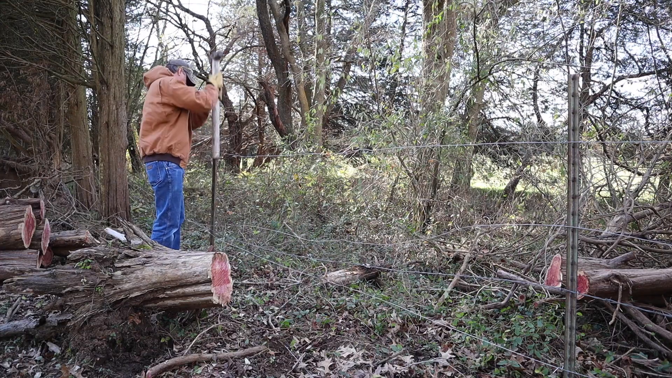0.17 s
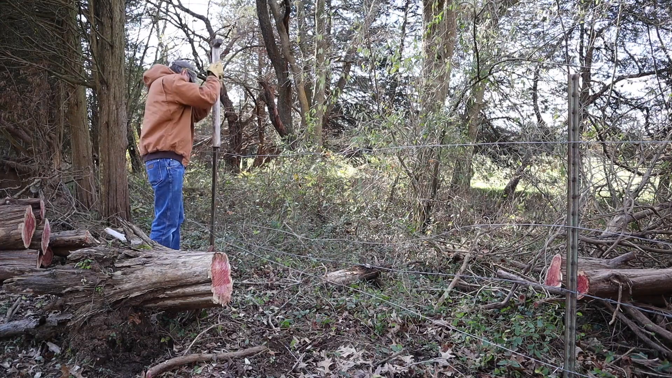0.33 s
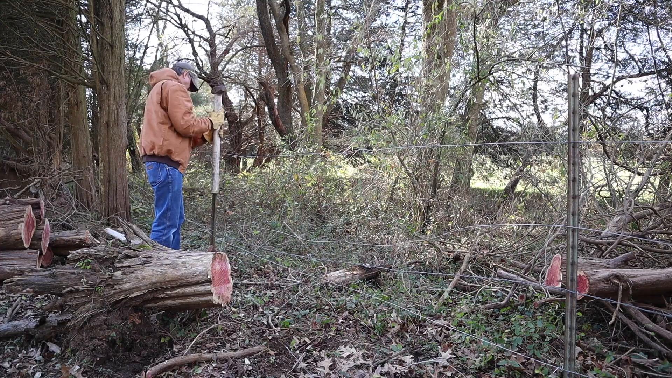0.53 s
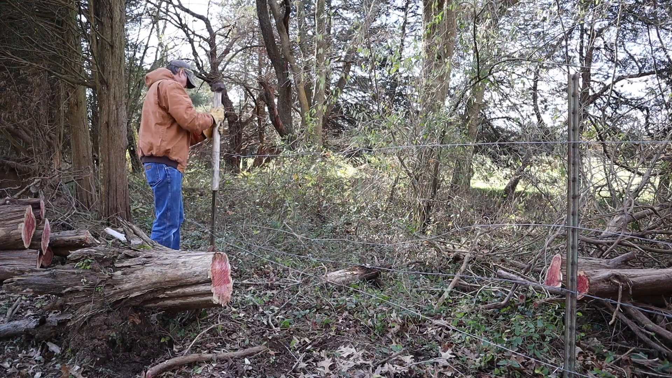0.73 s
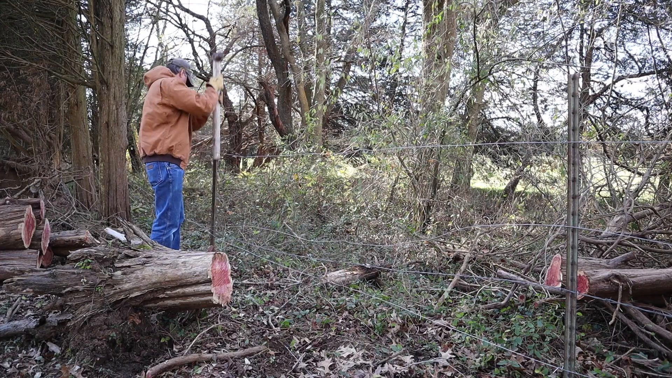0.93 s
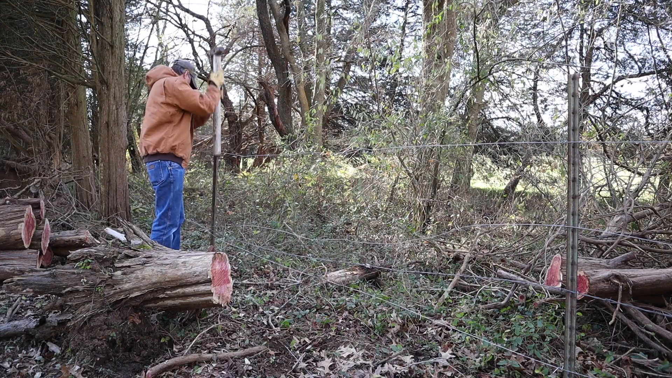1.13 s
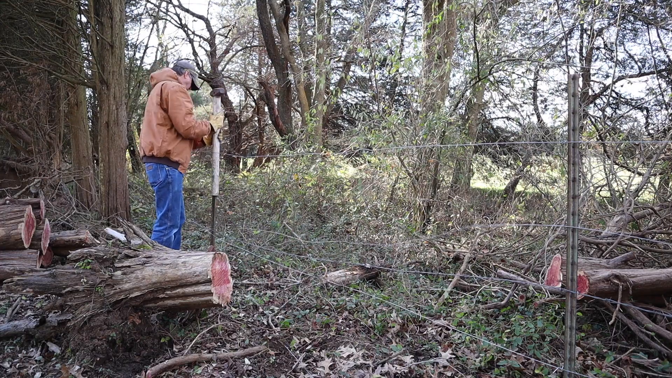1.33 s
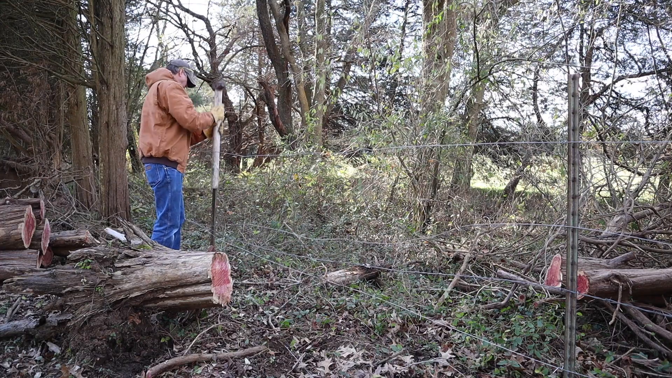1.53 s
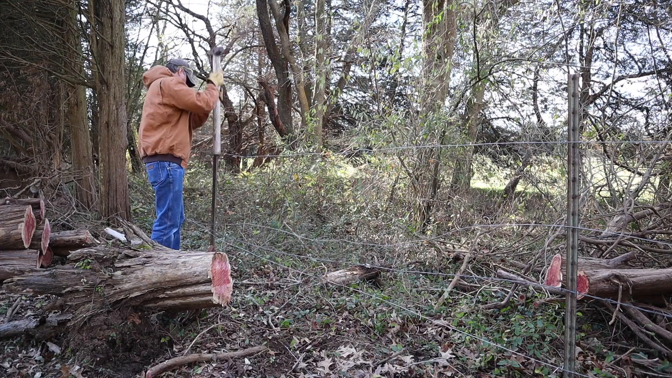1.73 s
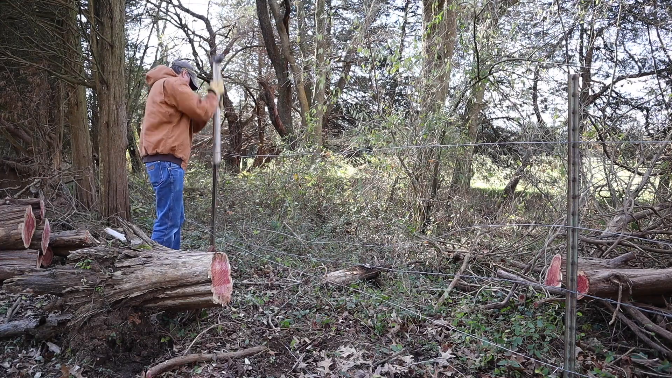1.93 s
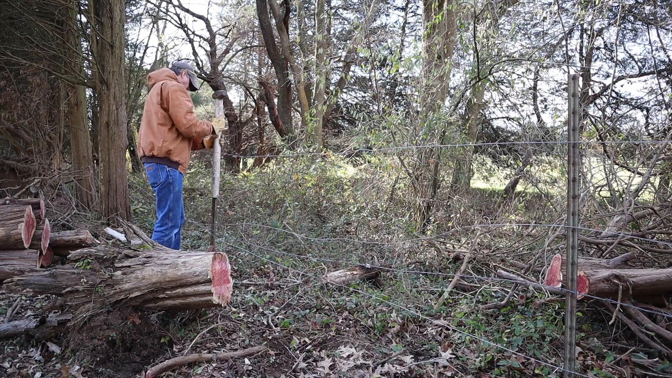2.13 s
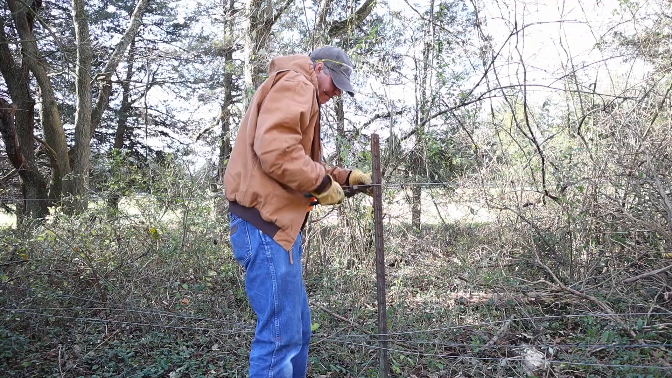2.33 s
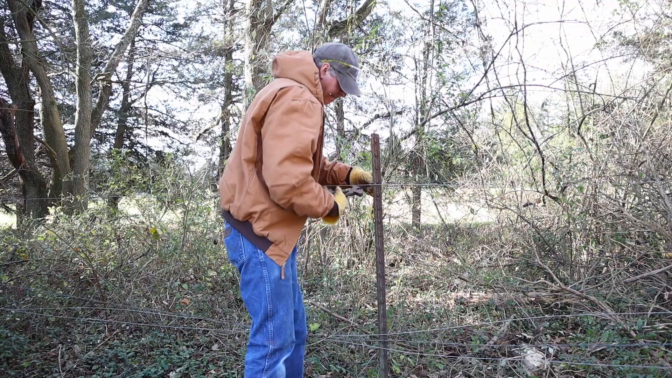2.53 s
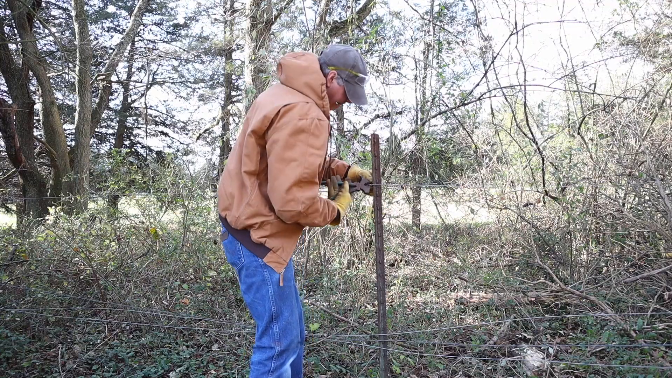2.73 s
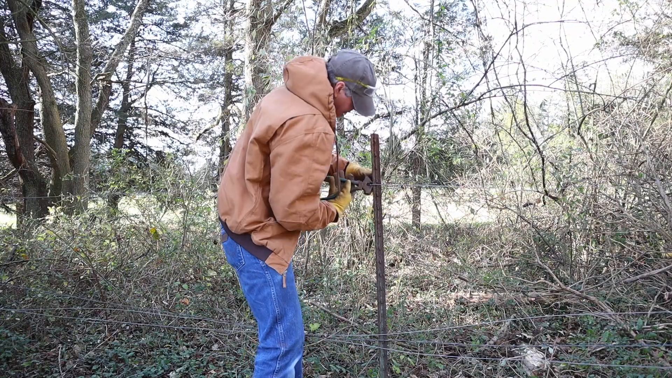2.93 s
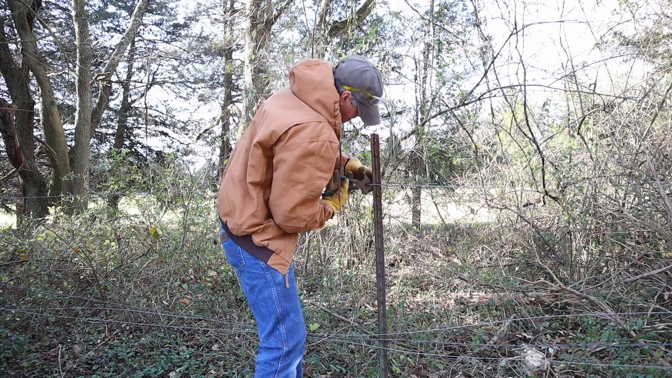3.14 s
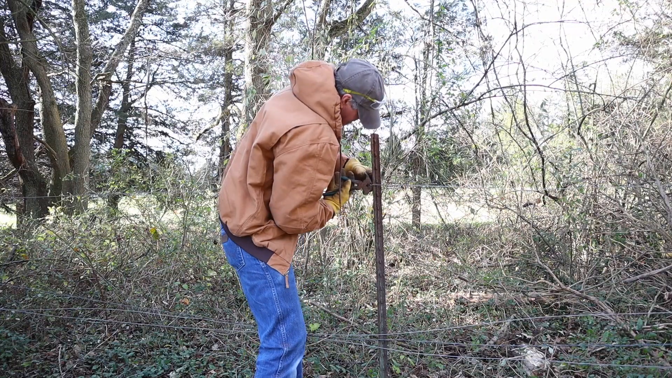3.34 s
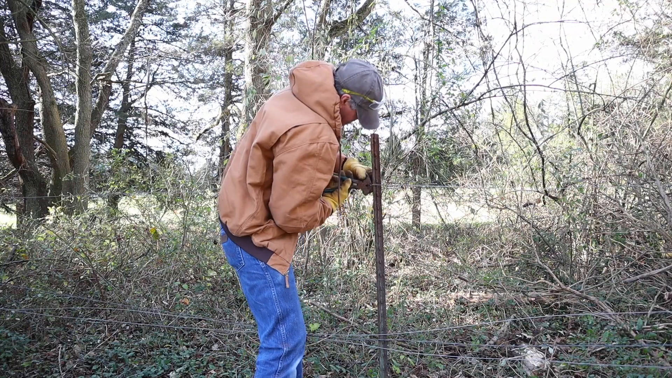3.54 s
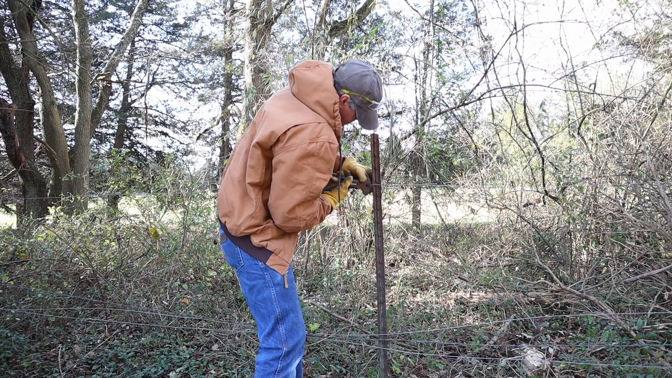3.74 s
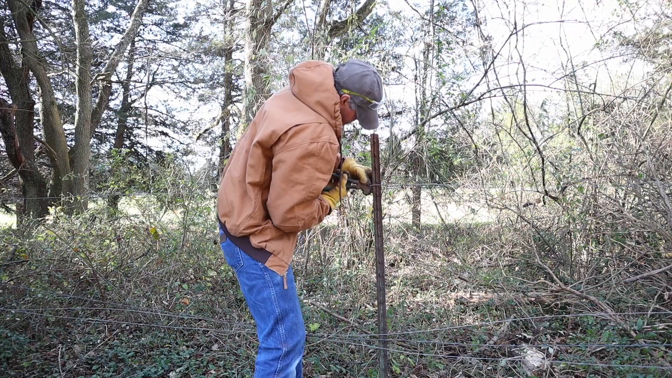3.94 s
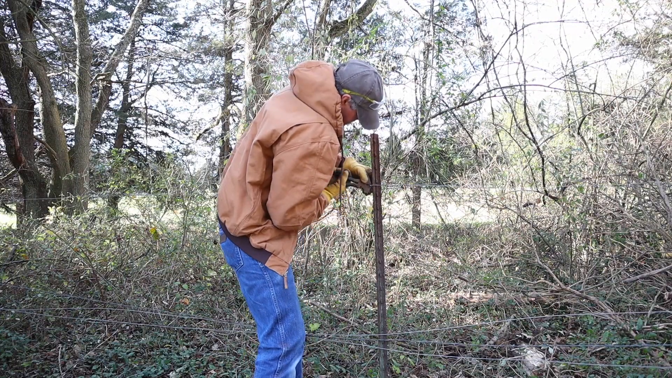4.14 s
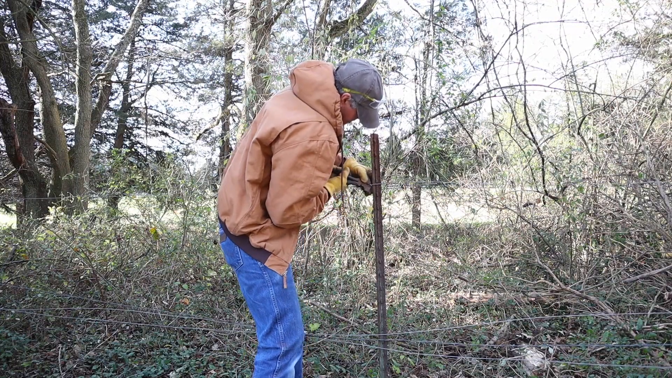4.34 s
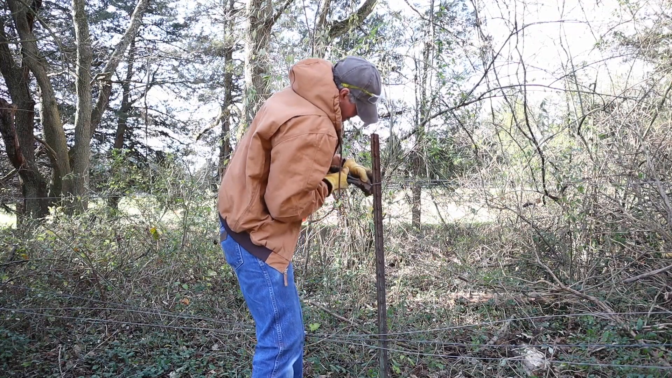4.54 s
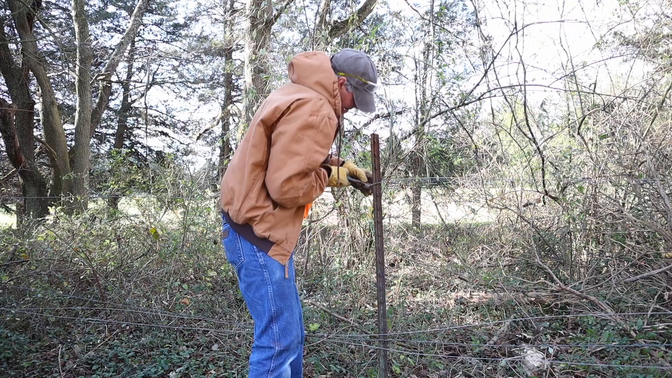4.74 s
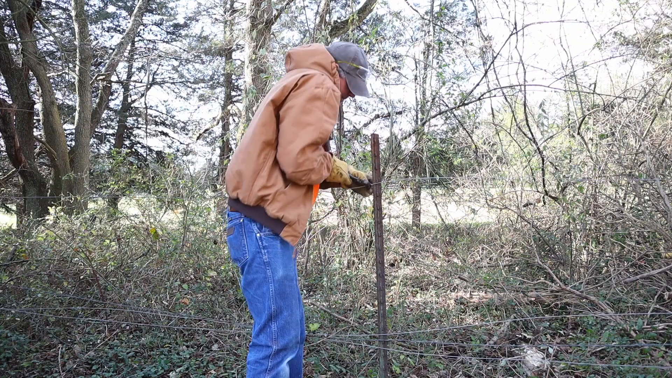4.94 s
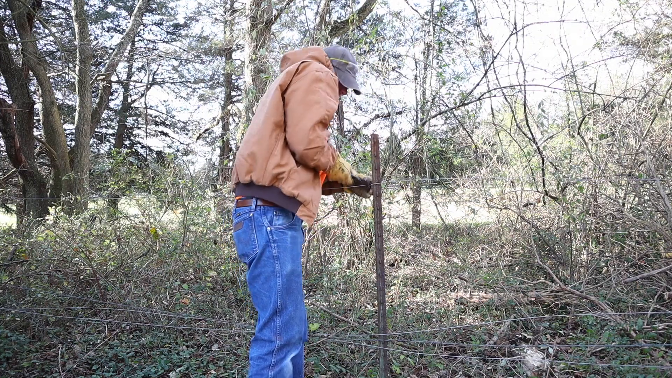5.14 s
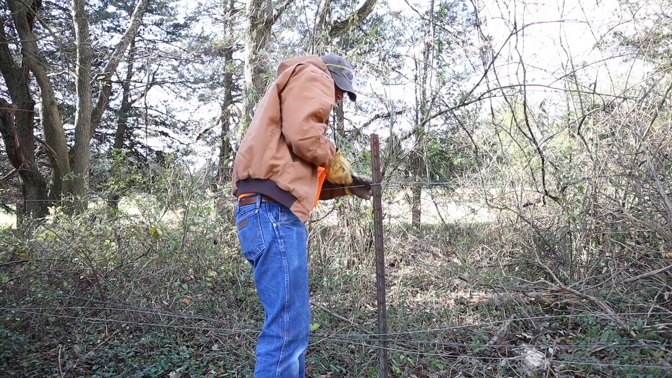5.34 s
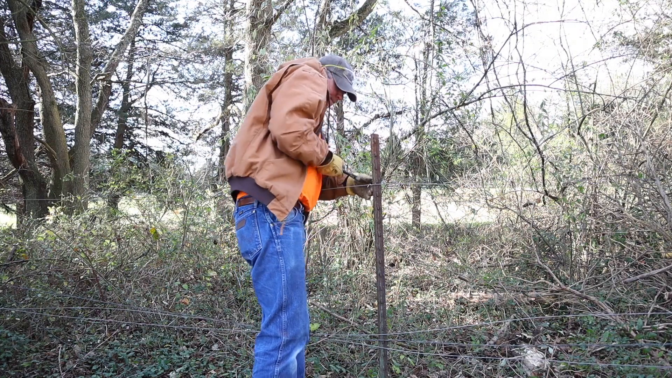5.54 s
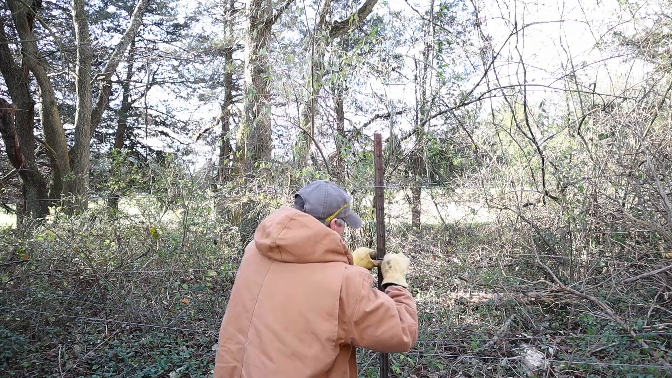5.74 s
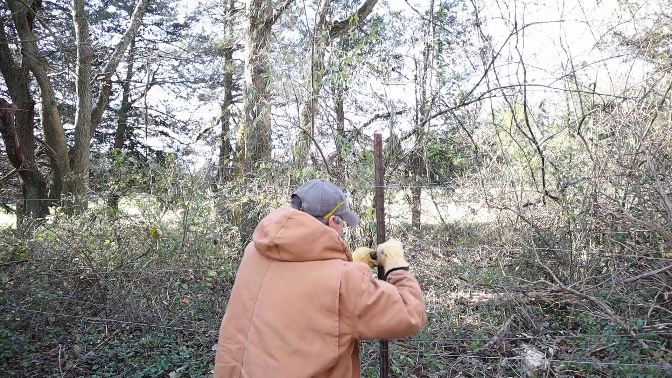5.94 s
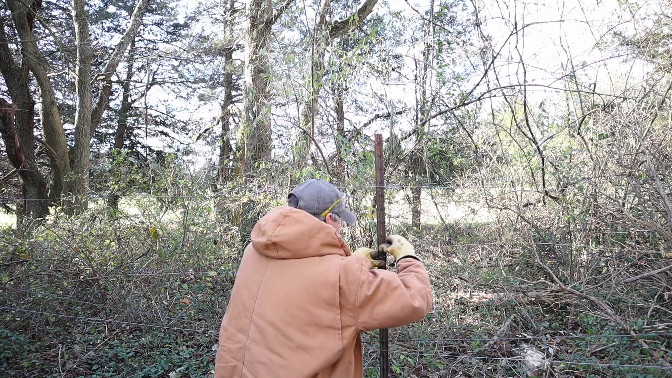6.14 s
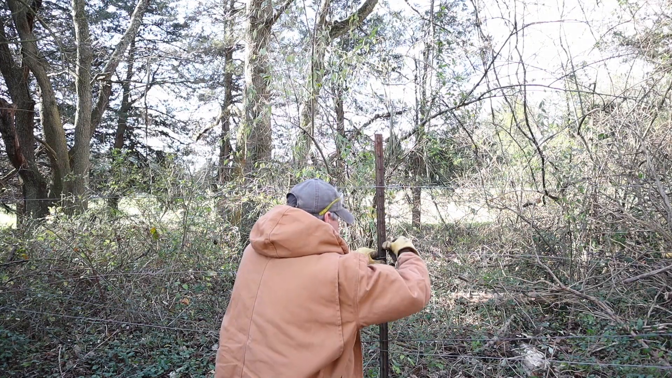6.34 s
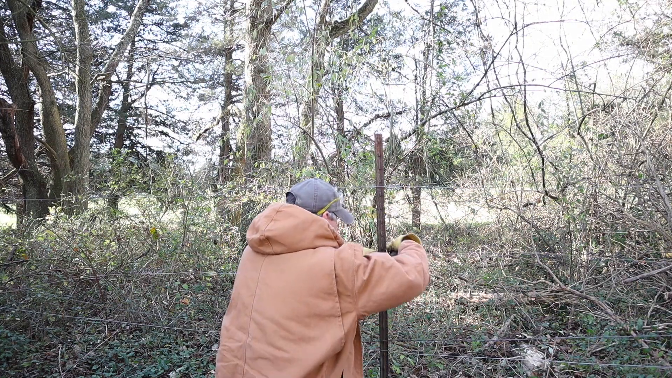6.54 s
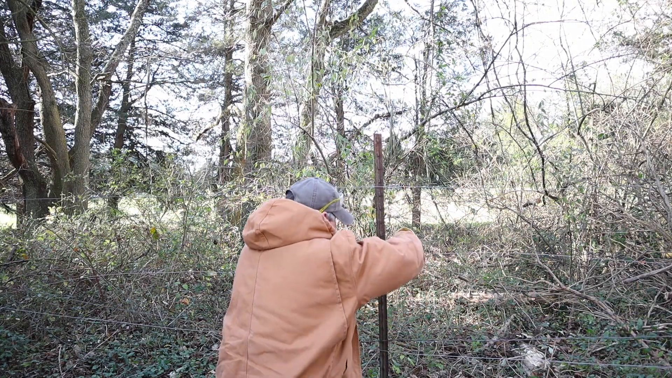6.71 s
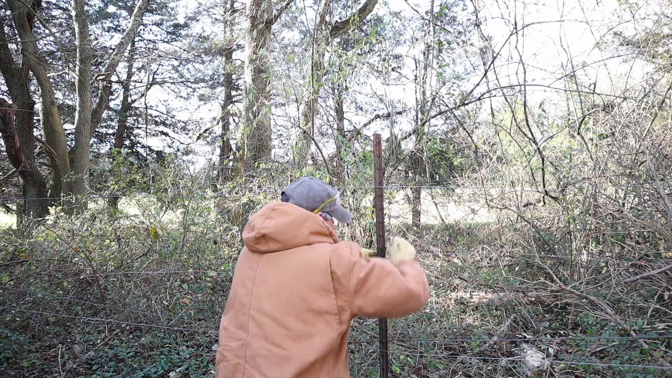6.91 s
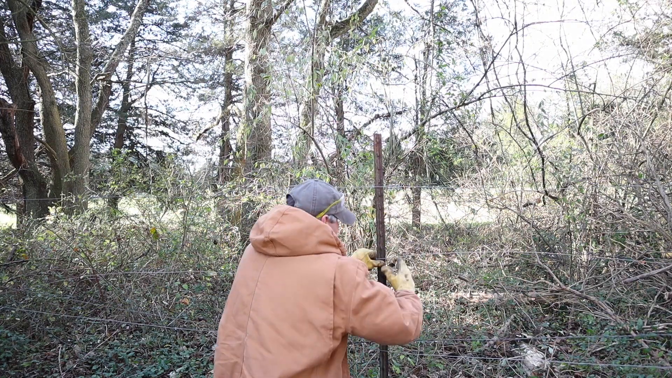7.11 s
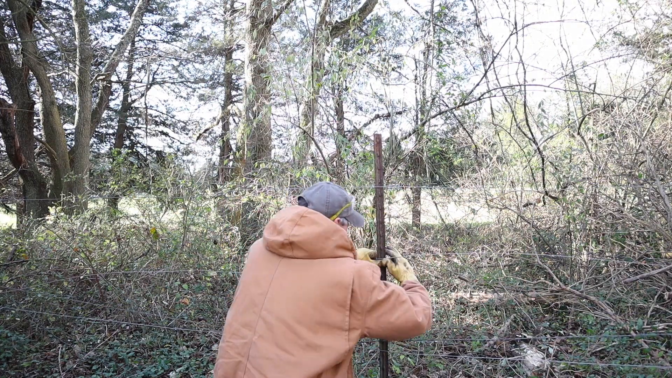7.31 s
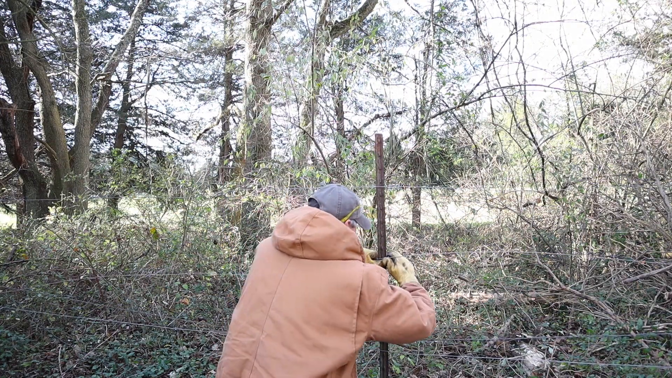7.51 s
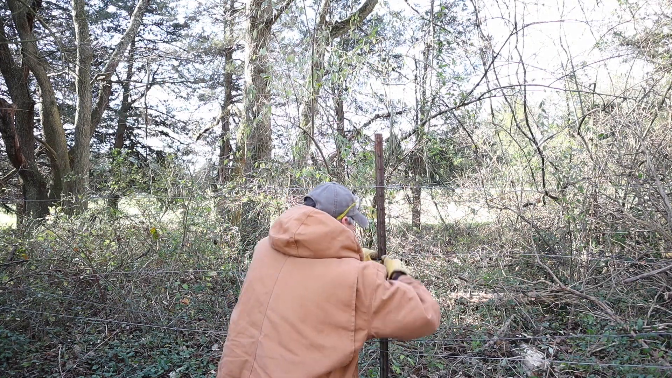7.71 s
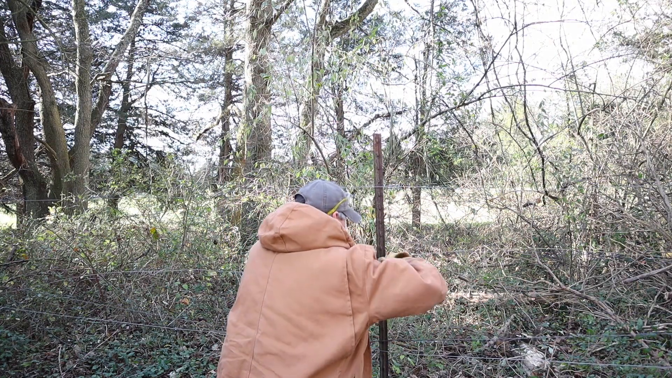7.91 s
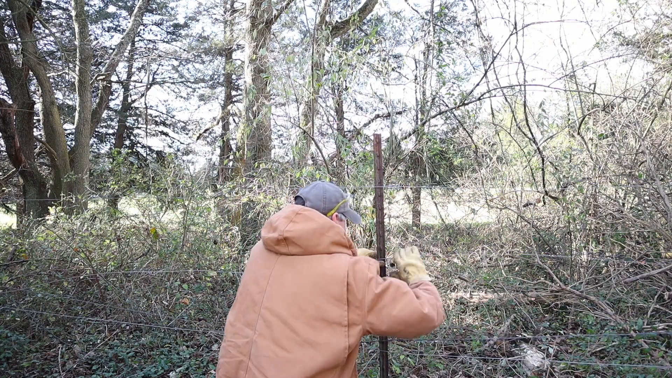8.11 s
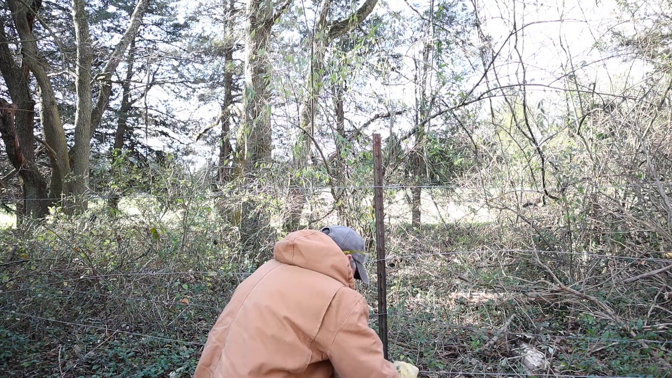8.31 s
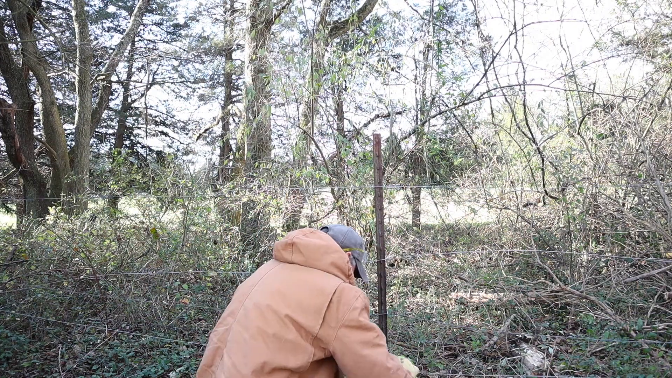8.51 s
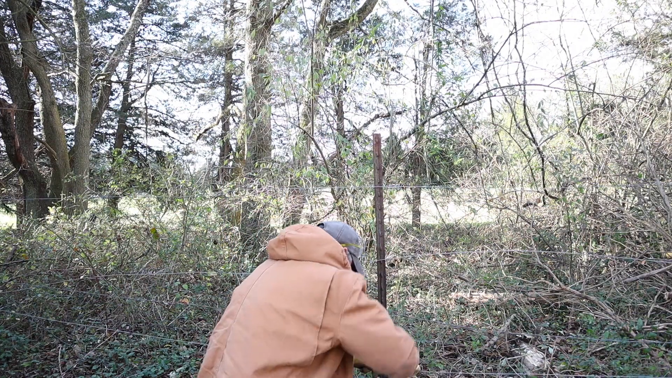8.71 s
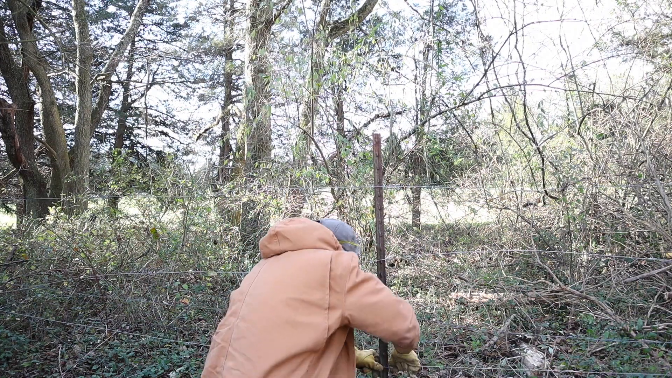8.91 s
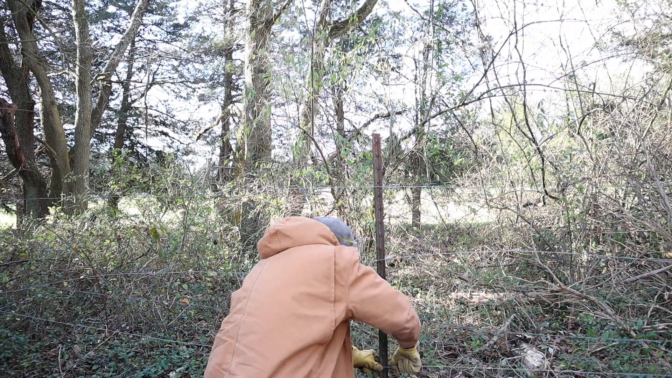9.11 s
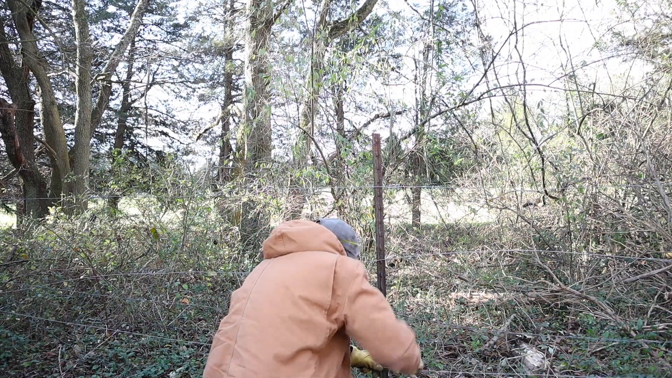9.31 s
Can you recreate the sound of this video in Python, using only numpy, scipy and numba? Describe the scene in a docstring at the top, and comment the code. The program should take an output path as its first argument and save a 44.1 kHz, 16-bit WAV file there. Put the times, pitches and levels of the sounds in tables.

```python
"""Rough steel scrapes upwards, knocks and slams: a man drives a fence post at the edge of a wood, in three strokes.
After an abrupt cut he clips wire to it while a distant vehicle passes; after another he works on in the quiet.
Struck steel is a sum of decaying modes plus noise bursts; sliding is a stream of random slips through resonators.
Wire, cloth and leaves are shaped noise, the vehicle is harmonics over coloured noise, and the wood is a scattered
tail. A fast limiter holds the clanks."""
import sys
import numpy as np
from scipy import signal
from scipy.fft import rfft, next_fast_len
from scipy.io import wavfile
from scipy.ndimage import uniform_filter1d, minimum_filter1d
from numba import njit

SR = 44100
rng = np.random.default_rng(int(sys.argv[2]) if len(sys.argv) > 2 else 0)


def log_audio(samples):
    """Write samples as a 16-bit WAV file to the path given in sys.argv[1]."""
    # one column per channel
    frames = np.atleast_2d(samples).T
    # limit to full scale, then quantise
    limited = np.clip(frames, -1, 1)
    pcm = np.round(limited * 32767).astype(np.int16)
    wavfile.write(sys.argv[1], SR, pcm)


N = 412776
T = np.arange(N) / SR
RING_T = T[:SR * 3 // 5]  # time axis of one ring or burst [s]
TOP_HZ = 16200  # upper limit of the sound

# the two cuts between the three sections: (time [s])
CUT_TIMES = (2.338, 5.775)

# strokes of the driver: (lift starts [s], tube tips over at the top [s], cap lands [s], scrape level [dB],
# blow level [dB], blow treble relative to body [dB], chatter length [s], low, middle, high favoured mode [Hz])
DRIVER_STROKES = [(0.107, 0.455, 0.5635, -44, -14.5, 0, 0.028, 1100, 2050, 4730),
                  (0.837, 1.215, 1.3224, -45.5, -16, 0, .021, 1050, 2560, 7130),
                  (1.609, 2.014, 2.0914, -45, -14, 1, .023, 2060, 3340, 3850)]
# modes of the post: (frequency [Hz], level [dB], t60 before favouring [s])
POST_MODES = [(102, -32, 1), (205, -24, .2), (307, -15, .37), (368, -8, .07), (511, -16.5, .23),
              (716, -26, .19), (942, -3.5, .115), (1045, -5, .05), (1110, -6, .055), (2035, -6, .055),
              (2072, -7, .125), (2628, -11, .075), (2988, -35, .65), (3144, -11, .08), (3190, -9, .075),
              (3440, -9, .07), (3812, -4, .06), (4177, -16, .1), (4796, -1.5, .075), (5028, -10, .06),
              (5190, -14, .09), (5372, -7, .085), (5722, -9, .06), (6210, -13, .08), (6500, -10, .065),
              (7205, -9, .06), (7412, -11, .065), (7640, -3.5, .068), (8192, -9, .065), (8344, -13, .07),
              (8988, -10, .095), (9685, -17, .065), (10968, -18, .07), (13008, -14, .115)]
# crowd of short-lived modes in a blow: (frequency [Hz], level [dB])
CLASH_SPECTRUM = [(50, -25), (110, -11.5), (220, 5.5), (300, 3.5), (410, 13.5), (600, 1.5), (800, 0),
                  (1080, 11), (1300, -2.5), (1650, -2.5), (2000, 7.5), (2350, 0), (3500, 5.5), (8000, 0.5),
                  (11000, -3.5), (16000, -13.5)]
# dense small modes of the post that outlast the crash: (frequency [Hz], level [dB])
SHIMMER_SPECTRUM = [(200, -20), (1500, -14), (3000, -1.5), (4500, 0), (6500, -3), (10000, -14),
                    (16000, -28)]
CLASH_T60_S, CHATTER_T60_S, CHATTER_DB = .075, .04, -3  # crash of a landing and of each rebound of the cap
SHIMMER_DB, SHIMMER_T60_S = -25, .27
CROWD_DB, CROWD_FULL_HZ = 6, 4000  # depth of the peaks in a clash, full above this frequency
# the spot that is struck favours some modes: louder, longer (as a fraction), over this range
FAVOUR_DB, FAVOUR_RING, FAVOUR_OCTAVES = 5.5, 0.08, 0.15

# the tube wobbles against the post, hardest as it tips over at the top:
# (time [s], body level before trim [dB], treble level before trim [dB], ring length [factor], favoured mode [Hz])
TUBE_KNOCKS = [(.261, -29.5, -43.5, 0.61, 1080), (.279, -35.5, -40, 1.15, 3850),
               (.327, -44.5, -47.5, 0.87, 3400), (0.351, -39, -48.5, 0.43, 1080),
               (0.414, -42.5, -54, .8, 1076), (0.4224, -35.5, -47.5, 1.3, 1074),
               (0.4512, -9, -18, 0.84, 1076), (.521, -46, -51, .7, 3840), (0.5361, -36.5, -30, 0.77, 4350),
               (0.7144, -36, -36, 1.07, 3850), (.775, -42.5, -65, 1.1, 1070), (.787, -44, -68, 1.1, 1070),
               (.846, -42.5, -48, 2.3, 945), (.899, -47, -52, 1, 3830), (.915, -45, -48, 1.1, 4320),
               (.929, -44, -45, 1.8, 4320), (1.0329, -34.5, -48, 0.63, 1076), (1.05, -36, -51, .8, 1076),
               (1.109, -48.5, -61, 1.1, 1076), (1.206, -11, -20.5, 0.7, 1100),
               (1.2678, -30.5, -36.5, 0.82, 360), (1.281, -40, -31.5, 0.67, 5400),
               (1.293, -42, -33, 1.2, 3440), (1.307, -33, -28.5, .87, 4350),
               (1.359, -34, -31.5, 0.74, 4350), (1.426, -33, -40.5, 0.57, 3370),
               (1.435, -35, -52, 0.79, 1070), (1.492, -45, -55, 1.1, 3830), (1.541, -48, -74, 1.1, 1070),
               (1.787, -39, -45.5, .9, 1070), (1.803, -34, -51, 0.78, 1052),
               (1.825, -35.5, -50.5, .57, 359.3), (1.842, -38, -54.5, 0.7, 1076),
               (1.873, -40.5, -58, 0.8, 1064), (1.919, -27.5, -46.5, 0.46, 1660),
               (1.936, -29.5, -42.5, 1.37, 1062), (1.993, -28.5, -38, 0.86, 4380),
               (2.0142, -13, -20, 0.79, 3770), (2.077, -41.5, -34.5, 1.5, 3860),
               (2.083, -30, -32, .97, 1066), (2.176, -39, -42.5, 1, 3800), (2.192, -37, -51, 0.76, 1050),
               (2.207, -41, -57, 1.1, 1076), (2.2522, -43.5, -38.5, 2.74, 3520)]
# modes of the driver's tube and the air in it: (frequency [Hz], level [dB], t60 before scaling [s])
TUBE_MODES = [(366, 2, .08), (402, -5, .045), (943, -15, .12), (1076, -1, .06), (1150, -9, .035),
              (1663, -9, .04), (1790, -11, .03), (2032, -7, .04), (2068, -19, .14), (2417, -19, .05),
              (2630, -19, .06), (3000, -28, .12), (3205, -14, .06), (3452, -15, .075), (3826, -10, .06),
              (4356, -13, .05), (5020, -19, .05), (5362, -15, .05), (5700, -17, .035), (6590, -18, .045),
              (7400, -21, .04), (8310, -24, .08), (9670, -25, .03)]
# crowd of short-lived modes in a knock: (frequency [Hz], level [dB])
THUD_SPECTRUM = [(50, -29), (110, -29), (220, -27), (420, 16), (750, 5), (1200, 9), (1800, -1.5),
                 (2400, -3.5), (3800, 1.5), (7000, -14.5), (11000, -16.5), (16000, -63.5)]
# crack of a knock: level at 0 dB of knock treble, dB gained per dB of that treble, decay
CRACK_DB, CRACK_GROWTH, CRACK_T60_S = 7.5, 1.68, 0.038
# light taps as the lift ends: spacing, body and treble before trim, spread
RATTLE_GAP_S, RATTLE_DB, RATTLE_TREBLE_DB, RATTLE_SCATTER_DB = 0.018, -47, -60.5, 2.5

# slowly dying modes of the raised driver and the post: (frequency [Hz], level [dB], t60 [s])
SINGING_MODES = [(2069, 0, .55), (2988, -9, .8)]
SING_LIFT_DB, SING_TIP_DB = -54.5, -43.5  # their level as the lift ends, and after the knock at the top

# wall resonances that sliding excites: (frequency [Hz], width [Hz], level [dB])
SCRAPE_MODES = [(370, 55, 6.5), (945, 24, 0), (1074, 41, 3), (1660, 22, -6), (2052, 20, 0.5),
                (2646, 22, -6.5), (3050, 100, -3.5), (3420, 20, -4.5), (3850, 25, -0.5), (4310, 14, -5),
                (5050, 50, -12.5), (5720, 40, -11), (6570, 56, -15), (7300, 60, -19), (8500, 170, -15)]
# slips that drive the air column: (frequency [Hz], level [dB])
COLUMN_SPECTRUM = [(100, -33.5), (250, -4.5), (450, 6), (750, 10), (1200, 4.5), (2400, -3), (3600, 1.5),
                   (6000, -25), (9000, -53.5), (16000, -79)]
# broad hiss of the rust itself: (frequency [Hz], level [dB])
RASP_SPECTRUM = [(200, -25), (500, -2), (1500, 0), (2400, -5), (3400, 1), (4500, -6), (7000, -16),
                 (16000, -40)]
LIFT_S = .23  # time to raise the driver
COLUMN_M, TRAVEL_M = .078, 0.18  # air column in the tube at rest, and what the lift adds
LIFT_ATTACK_DB_PER_S, LIFT_RELEASE_DB_PER_S = 161, 265  # the scrape on the way up sets in and dies
LOW_LIFT_DB = -7  # the scrape is this much softer while the tube still sits low
TIP_DB, TIP_S, TIP_DB_PER_S = -38.5, .024, 650.5  # scrape just before the top knock: level, length, edge slope
REST_DB = -61  # faint rubbing while the driver sits low on the post
WANDER_DB, WANDER_PER_S = 3, 30  # scale and rate of the swelling of each wall mode as the contact slides

# wire clip and pliers snap against the post:
# (time [s], treble level before trim [dB], body level before trim [dB], main resonance [Hz])
WIRE_CLICKS = [(2.834, -44, -45.5, 1080), (2.852, -38, -44.5, 1050), (3.8538, -47, -68, 1530),
               (4.2027, -41.5, -53, 1650), (4.217, -58, -47, 921), (4.2705, -69, -48.5, 1210),
               (4.498, -45, -64, 4200), (4.5323, -25, -43.5, 3500), (4.5454, -22.5, -44, 5370),
               (5.5317, -35, -39, 820), (5.571, -50, -46.5, 900), (5.9394, -31, -49.5, 4400),
               (5.956, -46, -56, 4500), (5.968, -28.5, -44.5, 3400), (5.9805, -31, -53, 4100),
               (5.998, -41, -55, 1500), (6.007, -40, -52, 1100), (6.019, -33.5, -45, 1600),
               (6.036, -33, -43, 1090), (6.043, -40, -50, 1000), (6.049, -38, -46, 1000),
               (6.054, -44, -48, 1050), (6.106, -42, -49, 1300), (6.1135, -44, -52, 1400),
               (6.1217, -36, -47.5, 1050), (6.207, -50, -56, 1500), (6.218, -27, -44.5, 3650),
               (6.233, -45, -52, 1200), (6.6751, -43.5, -53, 3840), (6.9188, -40, -49, 3700),
               (7.016, -50, -59, 5030), (7.5865, -40.5, -55, 3730), (8.0115, -48, -58, 960),
               (8.1, -70, -59, 1400), (8.132, -68, -60, 1400), (8.327, -53, -61, 2200),
               (9.007, -60, -55, 1450), (9.157, -55, -70, 1300)]
# noise burst of one snap: (frequency [Hz], level [dB])
SNAP_SPECTRUM = [(100, -40), (350, 4.5), (650, 8.5), (1100, 3.5), (1600, 2.5), (2700, -11.5), (3500, 2),
                 (4800, -0.5), (6500, -1.5), (10000, -5), (13000, -16), (16000, -20)]
# stray ticks of loose wire: rate, treble and body before trim, middle pitch, greatest scatter of level
TICKS_PER_S, TICK_TREBLE_DB, TICK_BODY_DB, TICK_HZ, TICK_SCATTER_DB = 1.6, -53, -66, 1270, 1
# dull knocks of hands and tools: (time [s], peak level [dB])
HAND_THUMPS = [(5.2731, -24), (5.419, -40), (5.5347, -32), (5.546, -38), (5.576, -39), (8.329, -47)]
# the wire grates as it is bent round the post: (time [s], half-length [s], level [dB])
WIRE_TWISTS = [(5.56, 0.025, -53.5), (6.02, 0.051, -58), (6.1, 0.02, -54.5), (6.232, 0.02, -57.5)]
# grating wire: (frequency [Hz], level [dB])
GRATE_SPECTRUM = [(100, -30), (450, 0), (1000, 7), (1600, 0), (2600, -18), (4200, -5), (10000, -14),
                  (16000, -22)]
# thin hiss of a skidding wire end: (frequency [Hz], level [dB])
SKID_SPECTRUM = [(300, -21), (1500, -9), (4500, -9), (5700, 3), (8500, 0), (10000, -9), (16000, -17)]
SKID_S, SKID_DB, SKID_T60_S = 8.209, -52.5, 0.13  # a wire end springs free and skids along the post

# a glove or sleeve brushes past, quickly or in a long reach: (time [s], half-length [s], level [dB])
CLOTH_SWISHES = [(2.75, 0.018, -52.5), (2.87, 0.38, -60), (3.98, 0.039, -58), (4.15, 0.032, -48),
                 (4.35, 0.38, -78), (5.12, 0.54, -57.5), (5.6, 0.045, -60), (6.09, 0.033, -69),
                 (6.82, 0.22, -65.5), (7.5, 0.52, -68.5), (7.91, 0.042, -60.5), (8.254, 0.041, -58.5),
                 (8.92, 0.24, -58.5), (8.98, 0.023, -55.5)]
# rubbing canvas: (frequency [Hz], level [dB])
CLOTH_SPECTRUM = [(30, -23), (100, -1), (300, 7.5), (600, 0.5), (1000, 2), (1600, -5), (2600, -6.5),
                  (4500, -5.5), (7000, -10.5), (10000, -16), (13000, -24.5), (16000, -26)]
FLUTTER_DB = 1.6  # unevenness of the rubbing cloth
# boots shift in the leaf litter: (time [s], half-length [s], level [dB])
BOOT_STEPS = [(8.11, 0.038, -65), (8.4, 0.16, -67.5), (8.98, 0.53, -62.5), (9.03, 0.071, -64)]
# crushed leaves: (frequency [Hz], level [dB])
LITTER_SPECTRUM = [(40, -7), (90, 5.5), (200, -4), (500, -6), (800, -1.5), (1150, -3), (1800, -14),
                   (4000, -20), (16000, -54)]
# soft low bumps as he shifts his stance: (time [s], peak level [dB], frequency [Hz], half-length [s])
STANCE_BUMPS = [(4.228, -39.5, 223, 0.0045), (5.116, -42, 91, 0.018), (5.132, -34, 129, 0.0045),
                (5.559, -49, 112, 0.027), (8.99, -51.5, 177, .014), (9.067, -51, 450, 0.0054)]

# firing rate of the distant vehicle: (time [s], rate [Hz])
FIRING_RATE = [(2.8, 131), (3.2, 129), (4.1, 123), (4.5, 119), (5, 108), (5.77, 100)]
# exhaust harmonics: (multiple of the firing rate, level [dB])
ENGINE_HARMONICS = [(.75, -15), (1, 0), (1.5, -17), (2, -18), (3, -23)]
# tyre wash: (frequency [Hz], level [dB])
ROAD_SPECTRUM = [(15, -44), (25, -19), (97, 1.5), (134, 2), (301, -9), (394, -8.5), (714, -16.5),
                 (818, -9.5), (887, -13), (3250, -23), (8830, -55), (14400, -61), (16000, -64)]
DRONE_DB, DRONE_DB_PER_HZ = -50, 0.67  # level at the highest revs; it fades as they sink
TYRE_DB, TYRE_DB_PER_S = -56, 0.5  # tyre wash at the first cut, and its growth

# still outdoor air: (frequency [Hz], level [dB])
AIR_SPECTRUM = [(15, -4), (25, -20), (38, -14.5), (97, 2), (123, 1), (405, -10), (463, -9.5), (911, -13),
                (2160, -24.5), (4370, -21), (6380, -22.5), (14800, -34.5), (16000, -49)]
AIR_DB = -63
FIRST_SECTION_AIR_DB = -3  # the air is stiller before the first cut
DIP_DB, DIP_S = -8.5, .12  # the background dips briefly after the second cut

CEILING_DB, ROUNDING_DB = -8, -11.2  # where the limiter holds, and where peaks are rounded off


def blows(clash_db=-1, rebounds=4):
    """Impact excitation: the landing cap rings the post's modes, then chatters unevenly on its top."""
    out = np.zeros(N)
    for _, _, land, _, blow_db, treble_db, chatter_s, *favoured in DRIVER_STROKES:
        spectrum = crowd(CLASH_SPECTRUM)
        clash = burst(spectrum, CLASH_T60_S)
        body, treble = split(ring(POST_MODES, favoured) + undb(clash_db) * clash)
        add(out, land, undb(blow_db) * (body + undb(treble_db) * treble))
        add(out, land, undb(blow_db + SHIMMER_DB) * burst(SHIMMER_SPECTRUM, SHIMMER_T60_S))
        # rebounds at uneven moments, each softer the later it comes
        for share in (np.arange(rebounds) + rng.uniform(.4, 1, size=rebounds)) / rebounds:
            rebound = burst(spectrum, CHATTER_T60_S)
            add(out, land + share * chatter_s, undb(blow_db + CHATTER_DB - 10 * share) * rebound)
    return out


def crowd(points, spacing_hz=70):
    """Modal density: a spectrum broken into narrow peaks, deeper in the treble where small modes stand apart."""
    hz, db = np.transpose(points)
    f = np.arange(50, TOP_HZ, spacing_hz)
    depth = np.minimum(f / CROWD_FULL_HZ, 1)
    peaks = np.clip(rng.standard_normal(len(f)), -2, 1.5) * depth
    level_db = np.interp(np.log(f), np.log(hz), db)
    return np.column_stack([f, level_db + CROWD_DB * peaks])


def ring(modes, favoured, length=1):
    """Modal superposition: decaying sines from rest, louder and longer near the favoured frequencies."""
    out = 0
    for hz, db, t60 in modes:
        level_scatter, tuning_scatter, polarity = rng.standard_normal(3)
        near = sum(np.exp(-(np.log2(hz / f) / FAVOUR_OCTAVES) ** 2) for f in favoured)
        gain = np.sign(polarity) * undb(db + level_scatter + FAVOUR_DB * near)
        decay = fade(t60 * length * (1 + FAVOUR_RING * near))
        out = out + gain * decay * np.sin(2 * np.pi * hz * (1 + tuning_scatter / 1000) * RING_T)
    return out


def knocks(thud_t60=0.049, body_db=1, treble_db=1, contact_s=0.00012):
    """Lateral impact: the tube hits the post with a grip-damped hollow clonk; hard hits add a short crack."""
    out = np.zeros(N)
    for s, low_db, high_db, length, hz in TUBE_KNOCKS + rattles():
        clonk = ring(TUBE_MODES, [hz], length) + undb(-4) * burst(THUD_SPECTRUM, thud_t60)
        onset = 1 - np.exp(-RING_T / contact_s)
        add(out, s, contact(clonk * onset, low_db + body_db, high_db + treble_db))
        crack = burst(CLASH_SPECTRUM, CRACK_T60_S)
        add(out, s, undb(CRACK_DB + CRACK_GROWTH * high_db) * crack)
    # the narrow tube radiates little below its lowest air resonance
    return sieve(out, 3, 230, "high")


def rattles(count=3):
    """Repeated light contact: the tube rattles as each lift ends, in rows like TUBE_KNOCKS."""
    rows = []
    for lift, *_ in DRIVER_STROKES:
        for k in range(count):
            s = lift + LIFT_S + RATTLE_GAP_S * (k - 1 + rng.uniform(-.5, .5))
            db = RATTLE_SCATTER_DB * rng.standard_normal()
            hz = rng.choice([mode_hz for mode_hz, *_ in TUBE_MODES])
            rows.append((s, RATTLE_DB + db, RATTLE_TREBLE_DB + db, 1, hz))
    return rows


def contact(x, body_db, treble_db, size=256):
    """Contact hardness: set the peak short-time level of body and treble; harder contact has more treble."""
    out = 0
    for part, db in zip(split(x), (body_db, treble_db)):
        peak_level = np.sqrt(uniform_filter1d(part ** 2, size).max())
        out = out + undb(db) * part / peak_level
    return out


def sliding(steel_db=-1.5, column_db=-4.5, rasp_db=-13):
    """Stick-slip friction: slips of rough steel excite the tube's air and wall modes as the contact moves."""
    slips = grains(4500, 1.7) * undb(2.4 * walk(140))
    wall = 0
    for hz, width, db in SCRAPE_MODES:
        mode = signal.lfilter(*signal.iirpeak(hz, hz / width, fs=SR), slips)
        wall = wall + undb(db + WANDER_DB * walk(WANDER_PER_S)) * mode
    quarter_wave_hz = 343 / (4 * (COLUMN_M + TRAVEL_M * height()))  # speed of sound 343 m/s
    column = pipe(colour(slips, COLUMN_SPECTRUM), quarter_wave_hz, .68)
    rasp = colour(slips, RASP_SPECTRUM)
    mix = undb(steel_db) * unit(wall) + undb(column_db) * unit(column) + undb(rasp_db) * rasp
    return mix * rubbing()


@njit
def pipe(x, hz, reflection):
    """Quarter-wave resonance: in a tube closed at one end sound returns inverted after half a period."""
    y = x.copy()
    for i in range(1000, len(x)):
        place = i - SR / (2 * hz[i])
        k = int(place)
        y[i] -= reflection * (y[k] + (place - k) * (y[k + 1] - y[k]))
    return y


def height():
    """Kinematics: height of the driver, 0-1; the lift slows towards the top, the fall speeds up."""
    out = 0
    for lift, tip, land, *_ in DRIVER_STROKES:
        rise = np.sin(np.pi / 2 * np.clip((T - lift) / LIFT_S, 0, 1))
        fall = np.clip((T - tip) / (land - tip), 0, 1) ** 2
        out = out + rise - fall
    return out


def rubbing():
    """Friction strength: the scrape grows through the lift, hushes at the top, swells as the tube tips over."""
    low = 1 - height()
    gain = undb(REST_DB) * low
    for lift, tip, _, scrape_db, *_ in DRIVER_STROKES:
        early, late = np.maximum(lift - T, 0), np.maximum(T - lift - LIFT_S, 0)
        edges_db = LIFT_ATTACK_DB_PER_S * early + LIFT_RELEASE_DB_PER_S * late
        gain = np.maximum(gain, undb(scrape_db + LOW_LIFT_DB * low - edges_db))
        outside_tip = np.abs(T - np.clip(T, tip - TIP_S, tip))
        gain = np.maximum(gain, undb(TIP_DB - TIP_DB_PER_S * outside_tip))
    return gain


def singing():
    """Light damping: lifted clear, the steel sings on thinly after each lift and each knock at the top."""
    out = np.zeros(N)
    for lift, tip, land, *_ in DRIVER_STROKES:
        for s, db in ((lift + LIFT_S, SING_LIFT_DB), (tip, SING_TIP_DB)):
            tone = 0
            for hz, mode_db, t60 in SINGING_MODES:
                tone = tone + undb(db + mode_db) * fade(t60) * np.sin(2 * np.pi * hz * RING_T)
            # silenced over the last 10 ms before the landing
            add(out, s, tone * np.clip((land - s - RING_T) / .01, 0, 1))
    return out


def clicks(snap_t60=0.013, tail_db=-22, tail_t60=0.066, body_db=1, treble_db=-9, sharpness=3):
    """Two-stage decay: dry snaps of wire, each with its own pitch and a faint shiver of the fence behind it."""
    out = np.zeros(N)
    for s, high_db, low_db, hz in WIRE_CLICKS + stray_ticks():
        decay = fade(snap_t60) + undb(tail_db) * fade(tail_t60)
        snap = colour(rng.standard_normal(len(RING_T)), SNAP_SPECTRUM) * decay
        snap = snap + signal.lfilter(*signal.iirpeak(hz, sharpness, fs=SR), snap)
        add(out, s, contact(snap, low_db + body_db, high_db + treble_db))
    return out


def stray_ticks(count=32):
    """Irregular contact: loose wire ticks now and then, in rows like WIRE_CLICKS."""
    rows = []
    for k, (late, a, b, c) in enumerate(rng.uniform(-1, 1, size=(count, 4))):
        s = CUT_TIMES[0] + (k + .5 + late / 2) / TICKS_PER_S
        treble_db = TICK_TREBLE_DB + TICK_SCATTER_DB * a
        body_db = TICK_BODY_DB + TICK_SCATTER_DB * b
        if s < T[-1]:
            rows.append((s, treble_db, body_db, TICK_HZ * 2 ** (c / 2)))
    return rows


def thumps(low_hz=200, high_hz=2000):
    """Band-limited impulse: gloved hands and tools give one short push, its lows trailing a little."""
    impulse = 1. * (RING_T == 0)
    push = sieve(impulse, 3, [low_hz, high_hz], "band")
    out = np.zeros(N)
    for s, db in HAND_THUMPS:
        add(out, s, undb(db) * push / np.abs(push).max())
    return out


def grating():
    """Granular friction: wire grates round the post between the snaps; one end skids away with a thin hiss."""
    out = colour(grains(3000, 1.8), GRATE_SPECTRUM) * swells(WIRE_TWISTS)
    add(out, SKID_S, undb(SKID_DB) * burst(SKID_SPECTRUM, SKID_T60_S))
    return out


def handling():
    """Granular noise: canvas rubs in fine grains; shifting weight crushes leaves and gives soft bumps."""
    rustle = colour(grains(7000, 0.64), CLOTH_SPECTRUM) * swells(CLOTH_SWISHES)
    out = rustle * undb(FLUTTER_DB * walk(35)) * (T > CUT_TIMES[0])
    out += colour(grains(700, 2.1), LITTER_SPECTRUM) * swells(BOOT_STEPS) * undb(1.2 * walk(30))
    t = RING_T - .1  # the bump is centred on its own time
    for s, db, hz, length in STANCE_BUMPS:
        add(out, s + t[0], undb(db) * np.exp(-(t / length) ** 2) * np.cos(2 * np.pi * hz * t))
    return out


def vehicle():
    """Periodic source: exhaust harmonics sink in pitch and level together over the growing wash of tyres."""
    hz = curves(FIRING_RATE)[0]
    turn = 2 * np.pi * np.cumsum(hz * (1 + .004 * walk(20))) / SR
    drone = sum(undb(db + walk(9)) * np.sin(k * turn) for k, db in ENGINE_HARMONICS)
    drone_db = DRONE_DB - DRONE_DB_PER_HZ * (hz.max() - hz)
    tyres = colour(rng.standard_normal(N), ROAD_SPECTRUM)
    tyre_db = TYRE_DB + TYRE_DB_PER_S * (T - CUT_TIMES[0])
    return unit(drone) * undb(drone_db) + tyres * undb(tyre_db)


def woods(x, wet_db=-27, t60=0.26):
    """Diffuse scattering: trunks and brush add a faint, duller tail that builds up and dies."""
    spectrum = [(100, 23.5), (500, 6.5), (4000, 5.0), (9000, 7.5), (16000, 1.5)]  # (frequency [Hz], level [dB])
    tail = burst(spectrum, t60) * (1 - fade(0.092))
    return x + undb(wet_db) * signal.fftconvolve(x, tail / np.linalg.norm(tail))[:N]


def still_air():
    """Broadband ambient noise: coloured noise wanders slowly, with a brief dip after the second cut."""
    dip_db = DIP_DB * (T > CUT_TIMES[1]) * np.exp(-((T - CUT_TIMES[1]) / DIP_S) ** 2)
    first_db = FIRST_SECTION_AIR_DB * (T < CUT_TIMES[0])
    return colour(rng.standard_normal(N), AIR_SPECTRUM) * undb(AIR_DB + dip_db + first_db + walk(2.363))


def undb(db):
    """Logarithmic level: decibels to gain."""
    return 10 ** (np.asarray(db) / 20)


def unit(x):
    """Normalisation: scale to rms 1."""
    return x / np.sqrt(np.mean(x ** 2))


def curves(table):
    """Linear interpolation: each column of a table, joined by straight lines in time."""
    s, *columns = np.transpose(table)
    return [np.interp(T, s, c) for c in columns]


def add(out, s, x):
    """Superposition: mix x in at time s."""
    i = int(s * SR)
    out[i:i + len(x)] += x[:N - i]


def fade(t60):
    """Exponential decay: a fall of 60 dB in t60 seconds."""
    return np.exp(-np.log(1000) * RING_T / t60)


def sieve(x, order, hz, kind):
    """Linear filtering: keep the low, high or middle band of x."""
    return signal.sosfilt(signal.butter(order, hz, kind, fs=SR, output="sos"), x)


def split(x, hz=2500):
    """Band division: body and treble of a sound."""
    return [sieve(x, 4, hz, kind) for kind in ("low", "high")]


def colour(x, points):
    """Spectral shaping: weight x by a curve of (frequency [Hz], level [dB]) points, at rms 1."""
    hz, db = np.transpose(points)
    size = next_fast_len(len(x))
    f = np.fft.rfftfreq(size, 1 / SR) + 1
    gain = undb(np.interp(np.log(f), np.log(hz), db))
    return unit(np.fft.irfft(rfft(x, size) * gain, size)[:len(x)])


def burst(spectrum, t60):
    """Decaying noise: coloured noise under an exponential envelope."""
    return colour(rng.standard_normal(len(RING_T)), spectrum) * fade(t60)


def walk(rate):
    """Slow random modulation: chance values, rate per second, joined by lines, with a spread near 1."""
    knots = rng.standard_normal(1024)
    return np.interp(T * rate, np.arange(len(knots)), knots)


def grains(rate, spread_db):
    """Random pulse train: tiny slips at random moments, a few much larger than the rest."""
    happens = rng.random(N) < rate / SR
    size_db = spread_db * np.minimum(rng.exponential(size=N), 5)
    return unit(happens * rng.standard_normal(N) * undb(size_db))


def swells(table):
    """Incoherent addition: bell-shaped swells for (time [s], half-length [s], level [dB]) rows add in power."""
    return np.sqrt(sum((undb(db) * np.exp(-((T - s) / length) ** 2)) ** 2 for s, length, db in table))


def scene():
    """Superposition of sources: three sections joined by hard cuts, over still outdoor air."""
    # slender steel radiates almost no deep bass
    steel = sieve(blows() + knocks() + sliding() + singing(), 4, 85, "high")
    driving = woods(steel) * (T < CUT_TIMES[0])
    wiring = woods(clicks() + thumps(), wet_db=-14.5, t60=0.088) + grating() + handling()
    passing = vehicle() * (T > CUT_TIMES[0]) * (T < CUT_TIMES[1])
    return (driving + wiring + passing + still_air())[None]


def record(dry, release_s=0.02, size=40):
    """Dynamic limiting: clanks are held, their peaks rounded, then let go; rumble and the top are cut."""
    x = sieve(dry, 2, [45, TOP_HZ], "band")
    over = np.log(np.maximum(np.abs(x[0]) / undb(CEILING_DB), 1))
    # gain reduction rises just ahead of each new peak and then relaxes exponentially
    held = np.exp(np.maximum.accumulate(np.log(over + 1e-12) + T / release_s) - T / release_s)
    gain = uniform_filter1d(minimum_filter1d(np.exp(-held), size), size)
    x = x * gain
    x = x / (1 + (x / undb(ROUNDING_DB)) ** 6) ** (1 / 6)
    x = sieve(x, 2, 35, "high")
    return signal.sosfilt(signal.ellip(10, .2, 70, TOP_HZ, fs=SR, output="sos"), x)


dry = scene()
out = record(dry)
log_audio(out)
```